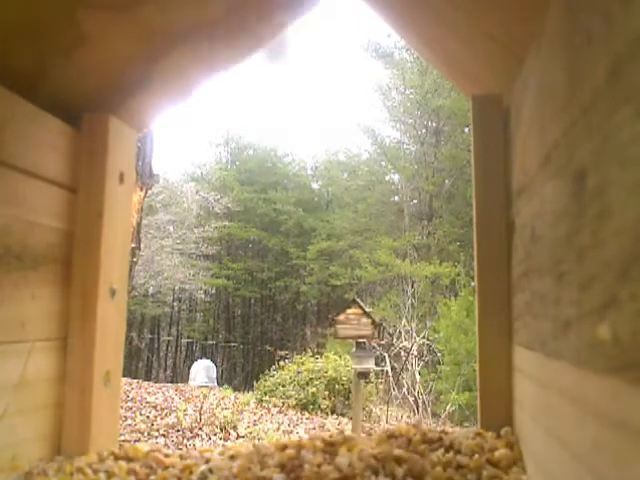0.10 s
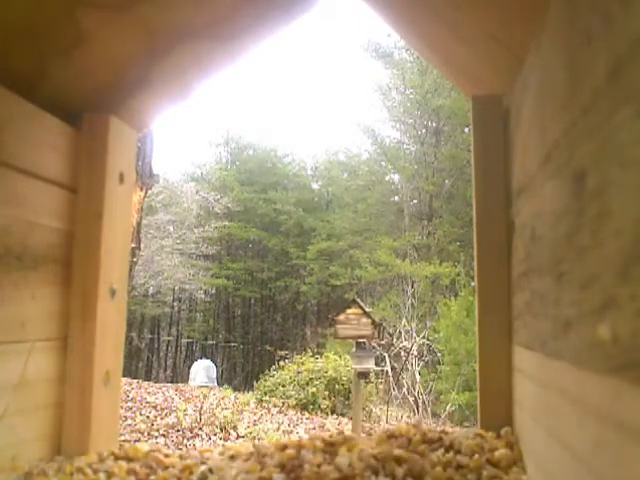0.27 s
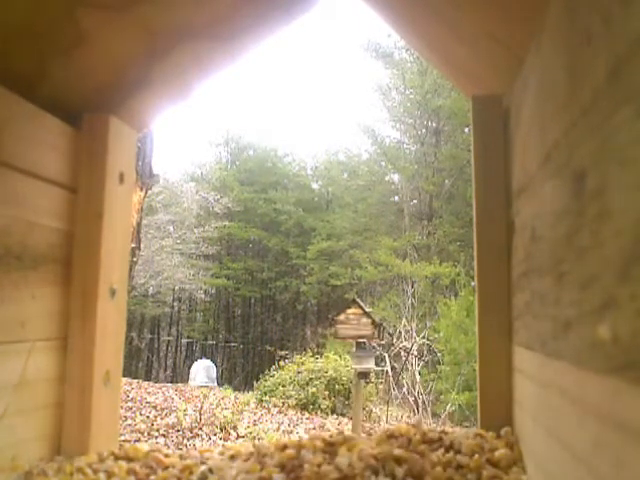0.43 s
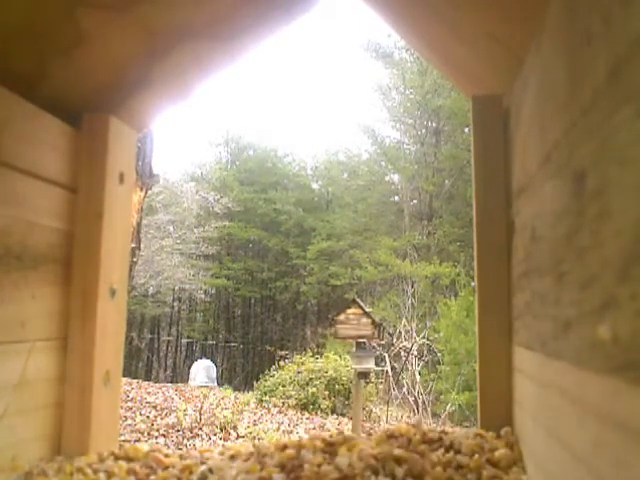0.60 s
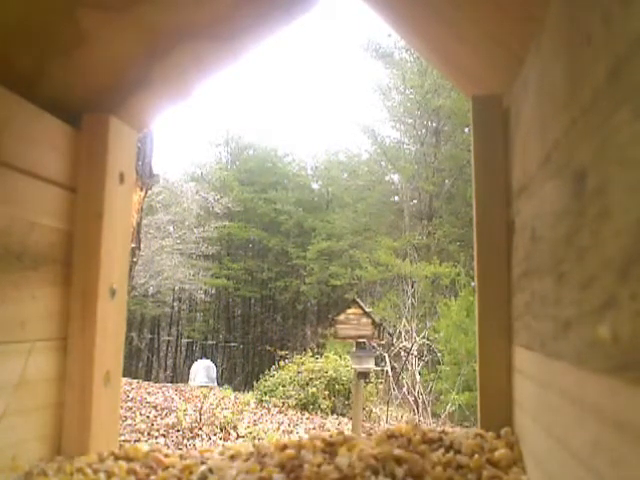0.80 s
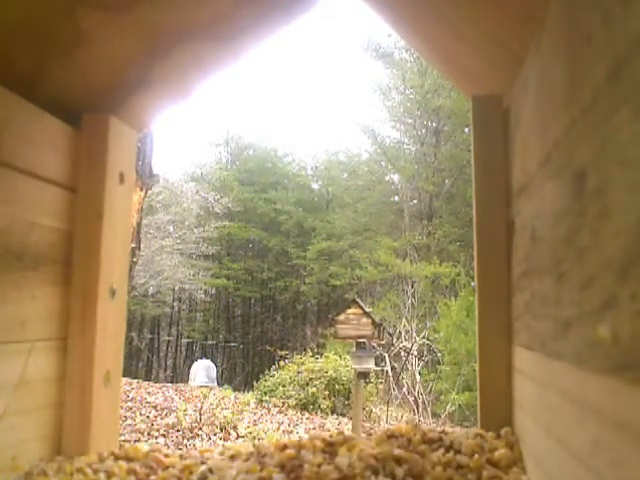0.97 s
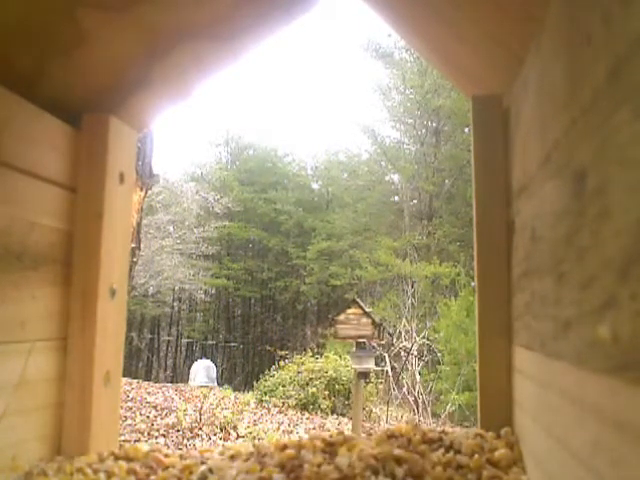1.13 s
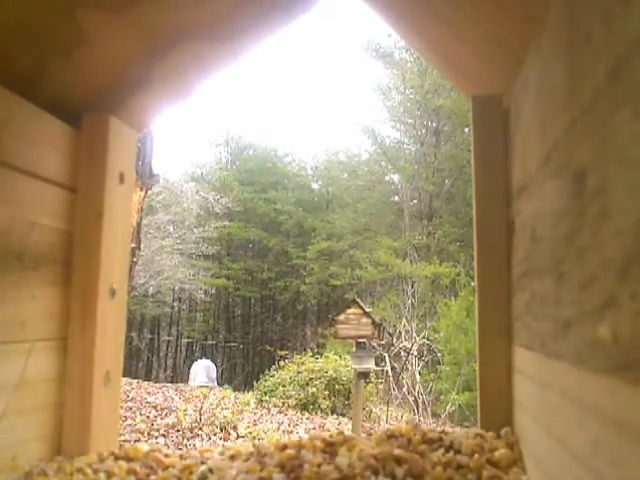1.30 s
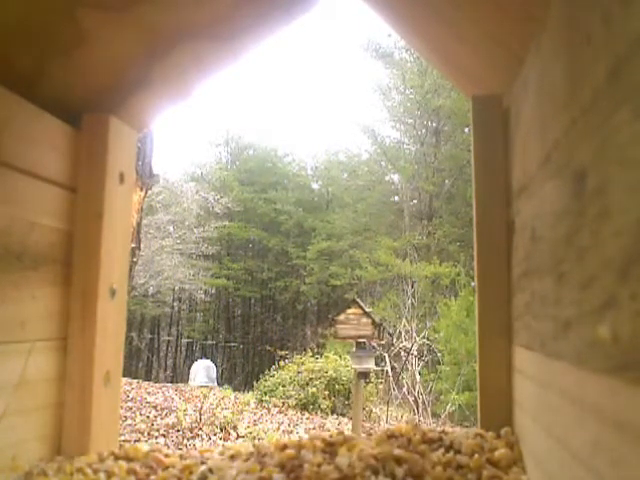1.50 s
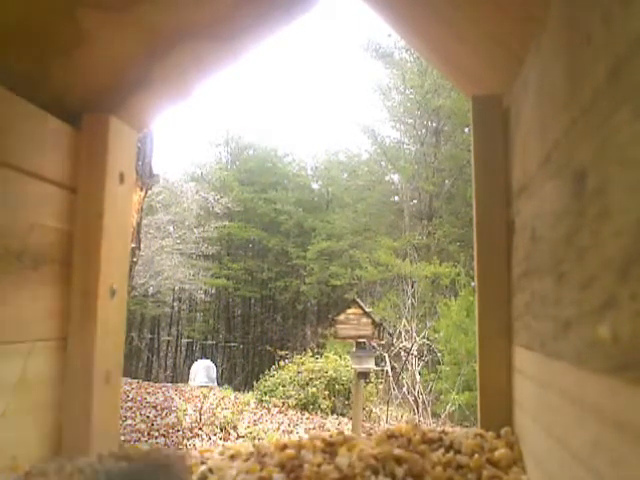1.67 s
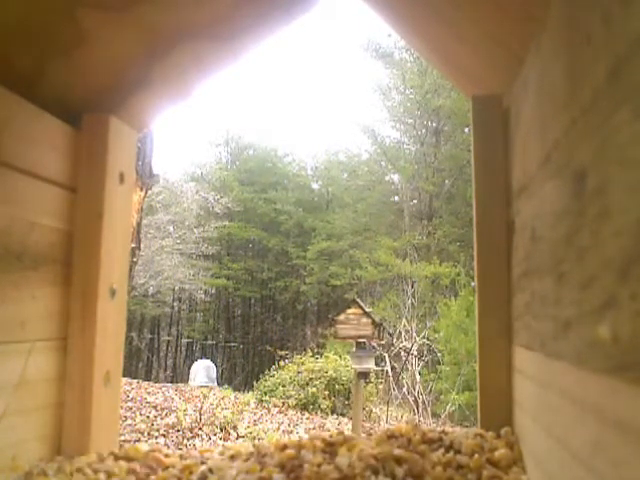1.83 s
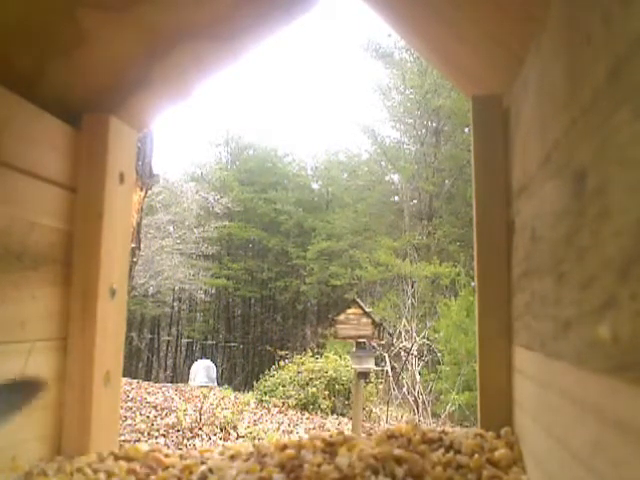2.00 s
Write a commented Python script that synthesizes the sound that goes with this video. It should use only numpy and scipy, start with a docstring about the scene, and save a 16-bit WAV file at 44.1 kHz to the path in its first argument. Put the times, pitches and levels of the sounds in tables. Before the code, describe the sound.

Close microphone inside a wooden feeder: soft wing flutter, a thin high whistle, then a run of harsh, nasal bird notes with light foot taps, later scuffs and a seed peck, a last faint flutter, over faint outdoor air.

```python
"""Quiet yard air lies below; wings puff into a wooden feeder box at the start and again at the end.
A small bird sings a rising whistle, then two short notes with whistled parts and seven longer raspy notes.
The rasp comes from two voices of the syrinx whose sums and differences fill the spectrum.
From the second short note on, feet tap and shuffle on the wood, ringing its modes.
After the song a beak pecks among seed: the tray rings under a short bright crack."""
import sys
import numpy as np
from scipy import signal
from scipy.fft import rfft, irfft
from scipy.io import wavfile

SR = 44100
rng = np.random.default_rng(int(sys.argv[2]) if len(sys.argv) > 2 else 0)


def store_wav(level_fs):
    """Save 16-bit WAV to argv[1]."""
    pcm = np.round(np.clip(np.atleast_2d(level_fs), -1, 1) * 32767)
    wavfile.write(sys.argv[1], SR, pcm.T.astype(np.int16))


def attenuation_scalar(level_db):
    """Turn a level in dB into a linear amplitude multiplier (20 dB per decade)."""
    decades = np.asarray(level_db, float) / 20
    return 10 ** decades


N = 92610

# Colour of throat, beak and the box around the microphone. Each row: frequency in Hz, relative level in dB.
THROAT_COLOUR = [(1480, -36.5), (1700, -22.5), (2300, -22.5), (2900, -16), (3400, -19.5), (4000, -20),
                 (4550, -13.5), (5100, -18), (5500, -11), (5850, -12), (6300, -20.5), (7300, -28),
                 (8000, -19), (11500, -44.5)]
# Spectrum of the yard air. Each row: frequency in Hz, relative density in dB per Hz.
YARD_COLOUR = [(30, -34), (505, -6.5), (655, -4.5), (995, -9), (5170, -20), (15500, -33.5)]
BROAD_NOISE_DB = -21.5  # in whistles and long raspy notes, re note level


def in_time(rows):
    """Columns joined by lines in time, and a gate that is 1 inside the rows."""
    s, *columns = np.transpose(rows)
    t = np.arange(N) / SR
    gate = (t >= s[0]) & (t <= s[-1])
    return [np.interp(t, s, c) for c in columns] + [gate]


def at_hz(points, hz):
    """Reads a spectrum in dB on a log frequency axis."""
    f, db = np.transpose(points)
    return np.interp(np.log(np.maximum(hz, 10)), np.log(f), db)


def rms_one(x):
    """Scales to rms 1."""
    return x / np.sqrt(np.mean(x ** 2) + 1e-20)


def coloured(points):
    """Noise of rms 1 with a given spectrum."""
    spectrum = rfft(rng.standard_normal(N))
    gain = attenuation_scalar(at_hz(points, np.fft.rfftfreq(N, 1 / SR)))
    return rms_one(irfft(spectrum * gain, N))


def drift(rate_hz, size):
    """Slow chance of rms 1: white noise through two equal poles."""
    r = np.exp(-2 * np.pi * rate_hz / SR)
    return rms_one(signal.lfilter([1], [1, -2 * r, r * r], rng.standard_normal(size)))


def butter(x, order, cut_hz, kind="low"):
    """Butterworth filter."""
    return signal.sosfilt(signal.butter(order, cut_hz, kind, fs=SR, output="sos"), x)


def ring(clicks, hz, t60_s):
    """A damped mode: a unit click sets a sine of initial height 1 ringing."""
    r, w = attenuation_scalar(-60 / (t60_s * SR)), 2 * np.pi * hz / SR
    return signal.lfilter([0, np.sin(w)], [1, -2 * r * np.cos(w), r * r], clicks + 1e-18)


def yard_air():
    """Steady noise with the yard's spectrum."""
    level_db = -68.5  # rms
    return attenuation_scalar(level_db) * coloured(YARD_COLOUR)


def wings():
    """Each stroke pushes a puff of air, a bell-shaped burst of noise that the box's air resonances colour."""
    # Each row: centre in s, peak level of the boom in dB rms.
    puffs = [(0.013, -54.5), (0.059, -60.5), (0.103, -64), (0.303, -60), (.345, -51), (1.958, -63.5),
             (1.997, -59)]
    # Air resonances of the box. Each row: centre in Hz, width in Hz, relative level in dB.
    box = [(167.7, 48, -16), (328, 176, -6.5), (630, 200, -13)]
    puff_sigma_s, hiss_re_boom_db = 0.01, -2
    t = np.arange(N) / SR
    white = rng.standard_normal(N)
    boom = 0
    for hz, width_hz, db in box:
        band = butter(white, 2, [hz - width_hz / 2, hz + width_hz / 2], "band")
        boom = boom + attenuation_scalar(db) * rms_one(band)
    strokes = sum(attenuation_scalar(db) * np.exp(-.5 * ((t - s) / puff_sigma_s) ** 2) for s, db in puffs)
    return strokes * (rms_one(boom) + attenuation_scalar(hiss_re_boom_db) * coloured(YARD_COLOUR))


def whistles():
    """One voice: a wavering sine, with an octave and throat-coloured noise while it is low,
    and a little broad noise that follows the note's level."""
    # Three whistles, each a list of rows. Each row: time in s, pitch in Hz, level of the fundamental in dB rms.
    glides = [
        [(.190, 2147, -68), (.196, 2464, -57), (.208, 2905, -48), (.2118, 3720, -42), (.2138, 4890, -30),
         (.2175, 6360, -25.5), (.222, 6540, -38), (.227, 7080, -30.5), (.2325, 7100, -28), (.2345, 6740, -50),
         (.2365, 6100, -32), (.240, 5970, -55)],
        [(.317, 3700, -42), (.320, 4180, -36.5), (.323, 5550, -30.5), (.327, 5350, -27), (.333, 5400, -95)],
        [(.397, 3900, -61), (.400, 4220, -24.5), (.403, 5110, -17.5), (.406, 5110, -36), (.412, 5130, -43.5)],
    ]
    jitter_hz, jitter_rate_hz = 24, 340
    octave_db, octave_fades_hz, octave_db_per_khz = 10, 3150, -70  # re fundamental; falls above the fade pitch
    out = np.zeros(N)
    for rows in glides:
        hz, level_db, inside = in_time(rows)
        turn = 2 * np.pi * np.cumsum(hz + jitter_hz * drift(jitter_rate_hz, N)) / SR
        khz_above = np.maximum(hz - octave_fades_hz, 0) / 1000
        octave = attenuation_scalar(octave_db + octave_db_per_khz * khz_above)
        overtone = octave * (np.sin(2 * turn) + .5 * coloured(THROAT_COLOUR))
        tone = np.sqrt(2) * (np.sin(turn) + overtone)
        broad_noise = attenuation_scalar(BROAD_NOISE_DB) * rng.standard_normal(N)
        out += inside * attenuation_scalar(level_db) * (tone + broad_noise)
    return out


def echoes(x):
    """A short diffuse tail from box walls and yard: decaying noise of set energy, convolved."""
    level_db, t60_s, delay_s = -25.5, 0.073, 0.004
    t = np.arange(SR // 2) / SR
    tail = rng.standard_normal(len(t)) * attenuation_scalar(-60 * t / t60_s) * (t > delay_s)
    return attenuation_scalar(level_db) * signal.fftconvolve(x, tail / np.sqrt(np.sum(tail ** 2)))[:N]


def rasps():
    """Two wavering voices mix into many tones; each passes the throat at its own pitch."""
    # Nine notes, each a list of rows. Each row: time in s, lower voice in Hz, upper voice in Hz,
    # level of the summed tones in dB rms.
    notes = [
        [(0.286, 1863, 2420, -43), (0.299, 2164, 2720, -39.5), (0.312, 2252, 2760, -33),
         (0.319, 2920, 4230, -33.5)],
        [(0.364, 1904, 2480, -33.5), (0.381, 2305, 2842, -31), (0.393, 2228, 3125, -28.5),
         (0.399, 2460, 4000, -30.5)],
        [(0.463, 1640, 2153, -30), (0.475, 1783, 2313, -33), (0.489, 1840, 2350, -27), (0.527, 1813, 2340, -29),
         (0.539, 1664, 2095, -30.5)],
        [(0.581, 1545, 1887, -35), (0.594, 1605, 2120, -31), (0.639, 1849, 2416, -27), (0.663, 1834, 2260, -27),
         (0.671, 1550, 2170, -34)],
        [(0.712, 1497, 1900, -33.5), (0.724, 1677, 2150, -32), (0.76, 1774, 2323, -29),
         (0.78, 1767, 2280, -29.5), (0.789, 1590, 2070, -36)],
        [(0.826, 1450, 1850, -38), (0.836, 1587, 2045, -33), (0.858, 1744, 2244, -29.5),
         (0.892, 1803, 2410, -28), (0.908, 1663, 2040, -33)],
        [(0.951, 1378, 1767, -46.5), (0.959, 1471, 1924, -32), (0.976, 1753, 2198, -28.5),
         (1.031, 1752, 2300, -28), (1.039, 1590, 2110, -31)],
        [(1.08, 1462, 1859, -34), (1.096, 1680, 2060, -31.5), (1.112, 1750, 2250, -31),
         (1.154, 1723, 2244, -31.5), (1.166, 1660, 2040, -33)],
        [(1.216, 1394, 1779, -41), (1.222, 1494, 1950, -33), (1.24, 1767, 2248, -31.5),
         (1.292, 1742, 2222, -31), (1.303, 1620, 2010, -34)],
    ]
    # A close reflection weakens one pitch, which moves as the bird turns. One value per note: pitch in Hz.
    notches_hz = [3600, 3700, 4090, 4250, 4560, 4490, 3530, 4720, 4720]
    # Relative tone levels in dB. Row k, column j (from 0): tone at (k + 1) low + (j - 1) (high - low).
    mix_db = [
        [-17, 1.5, 4.5, -6],
        [2.5, 12.5, 14, 9, 7.5, -10.5],
        [-4, 7, 6, 0.5, -2],
        [-13.5, -7.5, -36, -8],
    ]
    notch_db, notch_sigma_hz = -11, 200
    # outside the rows the note fades and its pitch sags, as a fraction per s
    rise_db_per_s, fall_db_per_s, sag_per_s, silent_db = 4501, 4199, 5.5, -71.5
    jitter_hz, jitter_rate_hz = 8, 170  # at the loudest of a long note
    weak_jitter, weak_jitter_max_db = .8, 12  # dB more jitter per dB below the note's loudest
    shimmer_db, shimmer_rate_hz = 1.8, 90
    short_s, short_rough_db = .05, 6  # shorter notes waver and hiss more
    throat_noise_db = -15  # re note level, long notes
    out = np.zeros(N)
    throat_noise, broad_noise = coloured(THROAT_COLOUR), rng.standard_normal(N)
    for rows, notch_hz in zip(notes, notches_hz):
        (s0, low0, high0, db0), (s1, low1, high1, db1) = rows[0], rows[-1]
        rough = attenuation_scalar(short_rough_db * (s1 - s0 < short_s))
        rise_s = (db0 - silent_db) / rise_db_per_s
        fall_s = (db1 - silent_db) / fall_db_per_s
        sag0, sag1 = 1 - sag_per_s * rise_s, 1 - sag_per_s * fall_s
        first = (s0 - rise_s, low0 * sag0, high0 * sag0, silent_db)
        last = (s1 + fall_s, low1 * sag1, high1 * sag1, silent_db)
        low, high, level_db, inside = in_time([first, *rows, last])
        size = inside.sum()
        weak_db = level_db.max() - level_db[inside]
        waver_hz = jitter_hz * rough * attenuation_scalar(np.minimum(weak_jitter * weak_db, weak_jitter_max_db))
        low = low[inside] + waver_hz * drift(jitter_rate_hz, size)
        high = high[inside] + waver_hz * drift(jitter_rate_hz, size)
        tones, power = 0, 1e-12
        for k, row in enumerate(mix_db):
            for j, db in enumerate(row):
                hz = (k + 1) * low + (j - 1) * (high - low)
                dip_db = notch_db * np.exp(-.5 * ((hz - notch_hz) / notch_sigma_hz) ** 2)
                gain = attenuation_scalar(db + at_hz(THROAT_COLOUR, hz) + dip_db)
                turn = 2 * np.pi * (np.cumsum(hz) / SR + rng.random())
                shimmer = attenuation_scalar(shimmer_db * drift(shimmer_rate_hz, size))
                tones = tones + gain * shimmer * np.sin(turn)
                power = power + gain ** 2 / 2
        hiss = attenuation_scalar(throat_noise_db) * throat_noise[inside] + attenuation_scalar(BROAD_NOISE_DB) * broad_noise[inside]
        out[inside] += attenuation_scalar(level_db[inside]) * (tones / np.sqrt(power) + rough * hiss)
    return out


def feet():
    """Each contact is a first blow and a run of small slips; its spot on the wood favours some modes."""
    # Each row: start in s, drive level in dB, length in s.
    taps = [(0.397, -16, 0.0014), (.400, -35, .028), (0.458, -49.5, 0.059), (0.545, -44, 0.072),
            (0.625, -29, 0.0037), (0.634, -42.5, 0.041), (0.905, -22.5, 0.0011), (0.929, -38, 0.0025),
            (1.421, -39, 0.024), (1.4724, -17.5, 0.0037), (1.476, -31.5, 0.021), (1.4993, -19, 0.00084),
            (1.502, -50, 0.028), (1.596, -39, .025), (1.66, -40.5, 0.021)]
    # Modes of the wood. Each row: frequency in Hz, gain in dB, t60 in s.
    wood = [(454, -9.5, 0.033), (615, -8.5, 0.021), (833, 0, 0.023), (998, -13, 0.019), (2010, -15, 0.021)]
    slips_per_s, contact_cut_hz, tick_db, spot_spread_db = 1500, 1000, -22, 1.5
    full_run_s, full_blow_s = 0.033, 0.004  # shorter contacts slip less, longer ones start softer
    slips = (rng.random(N) < slips_per_s / SR) * rng.uniform(-0.98, 1, N)
    spot = attenuation_scalar(spot_spread_db * rng.standard_normal((len(taps), len(wood))))
    blows = np.zeros((len(wood), N))
    for (s, db, length_s), share in zip(taps, spot):
        i, j = int(s * SR), int((s + length_s) * SR)
        run = slips[i:j] * np.hanning(j - i) ** 0.25 * min(1, length_s / full_run_s)
        run[0] = min(1, full_blow_s / length_s)
        blows[:, i:j] += attenuation_scalar(db) * share[:, None] * run
    soft = butter(blows, 2, contact_cut_hz)
    out = attenuation_scalar(tick_db) * blows[0]  # unsoftened tick
    for k, (hz, db, t60_s) in enumerate(wood):
        out = out + (-1) ** k * attenuation_scalar(db) * ring(soft[k], hz, t60_s)
    return out


def pecks():
    """A beak among seed: sharp blows ring the tray and give a short bright crack of decaying noise."""
    # Each row: time in s, drive level in dB.
    hits = [(1.742, -39.5), (1.745, -37), (1.751, -38), (1.778, -50)]
    # Modes of the tray. Each row: frequency in Hz, gain in dB, t60 in s.
    tray = [(713, 1.5, 0.048), (1028, -15, 0.039)]
    crack_db, crack_decay_s, crack_cut_hz = -10, 0.0037, 6200
    blows = np.zeros(N)
    for s, db in hits:
        blows[int(s * SR)] = attenuation_scalar(db)
    envelope = signal.lfilter([1], [1, -np.exp(-1 / (crack_decay_s * SR))], blows)
    crack = butter(envelope * rng.standard_normal(N), 2, crack_cut_hz)
    return sum(attenuation_scalar(db) * ring(blows, hz, t60_s) for hz, db, t60_s in tray) + attenuation_scalar(crack_db) * crack


def scene():
    """Everything reaches one microphone, heard alike on both channels."""
    panel_cut_hz = 372  # the small panels radiate little lower
    bird = whistles() + rasps()
    wood = butter(feet() + pecks(), 4, panel_cut_hz, "high")
    mono = yard_air() + wings() + bird + echoes(bird) + wood
    return np.array([mono, mono])


def top_cut(x):
    """Nothing passes above the cut-off."""
    return signal.sosfilt(signal.butter(12, 15630, fs=SR, output="sos"), x)


def record(dry):
    """The microphone cuts the top steeply."""
    top_hz = 13950
    mix = butter(dry, 8, top_hz)
    return top_cut(mix)


dry = scene()
out = record(dry)
store_wav(out)
```